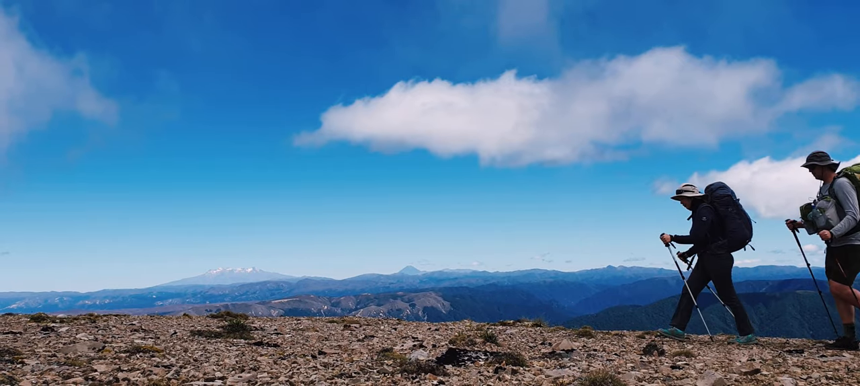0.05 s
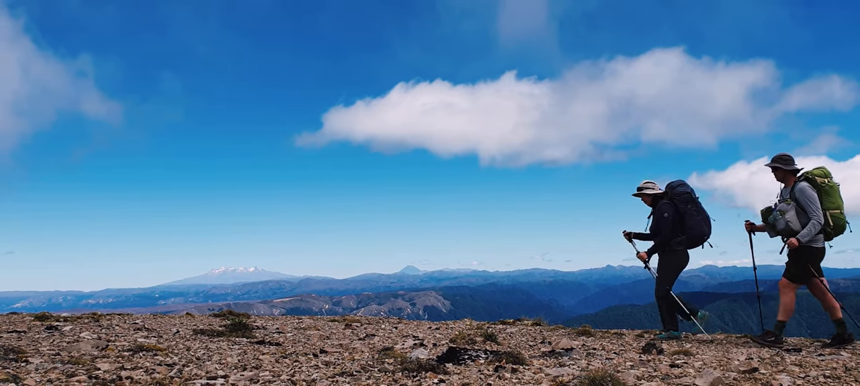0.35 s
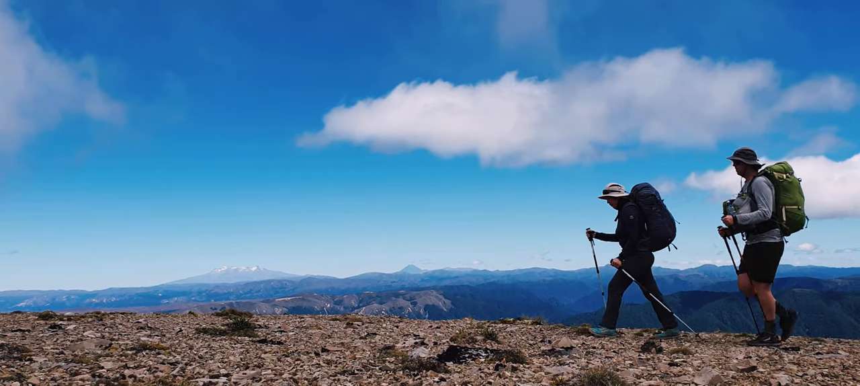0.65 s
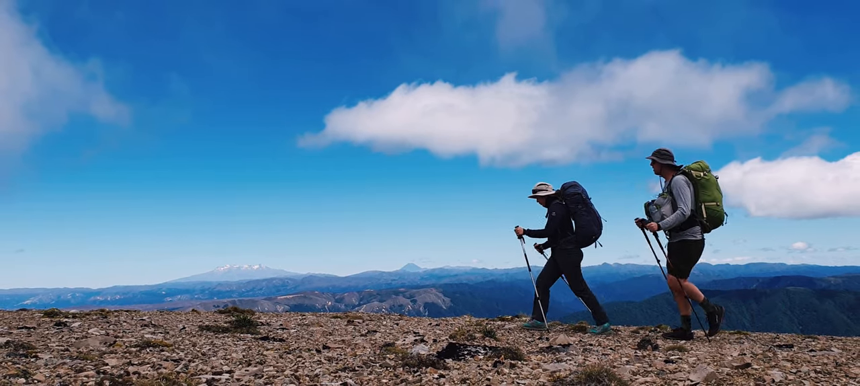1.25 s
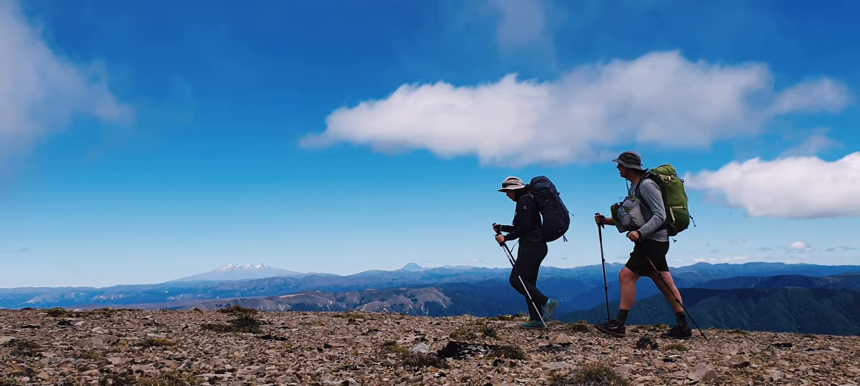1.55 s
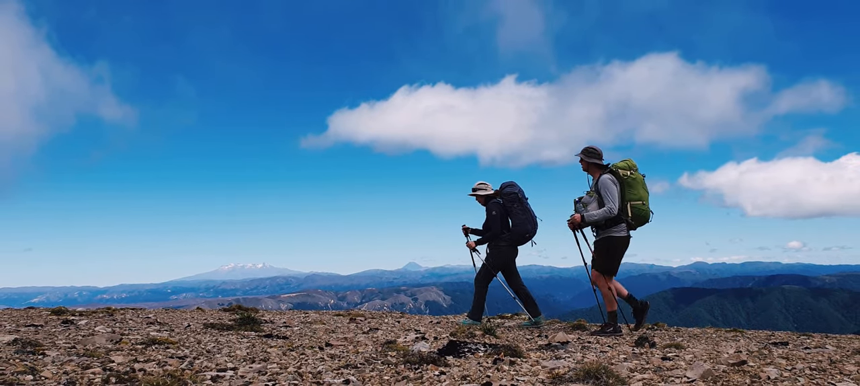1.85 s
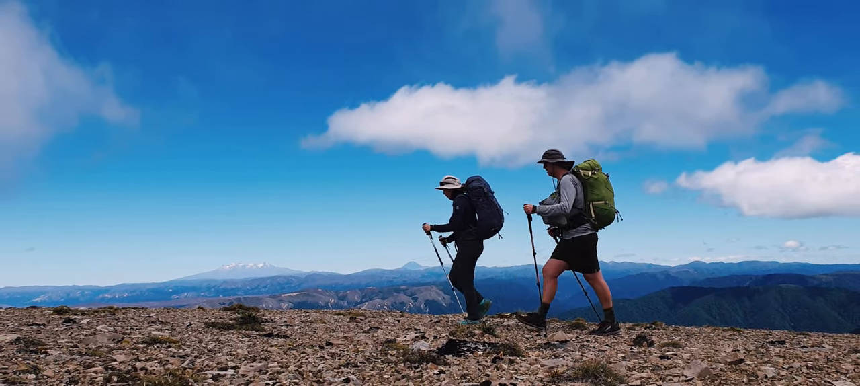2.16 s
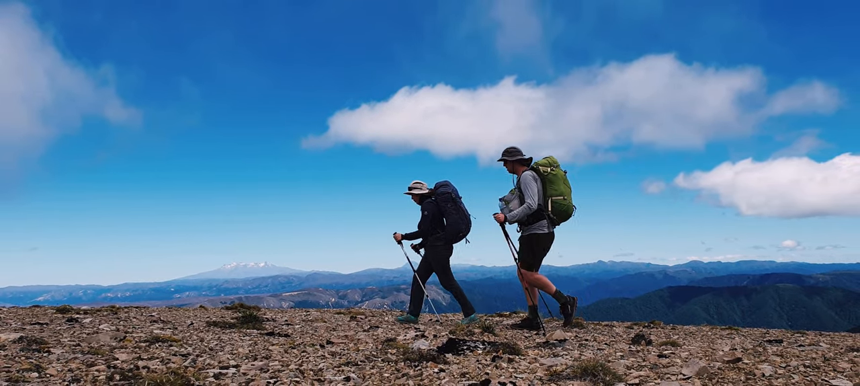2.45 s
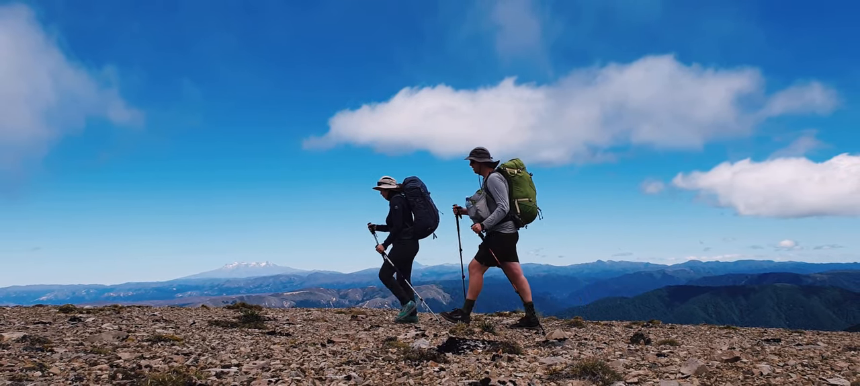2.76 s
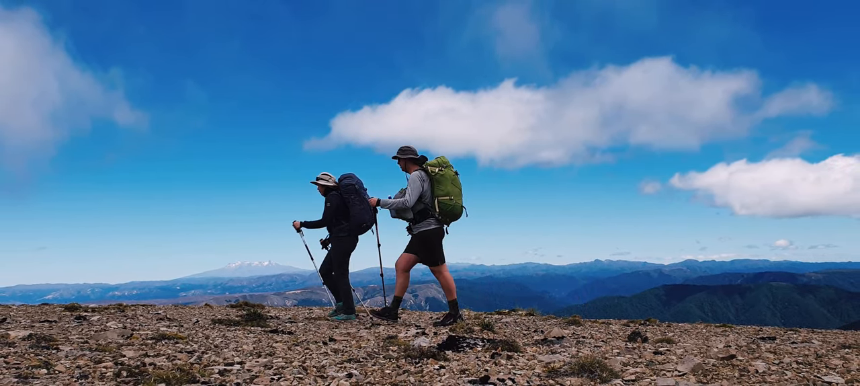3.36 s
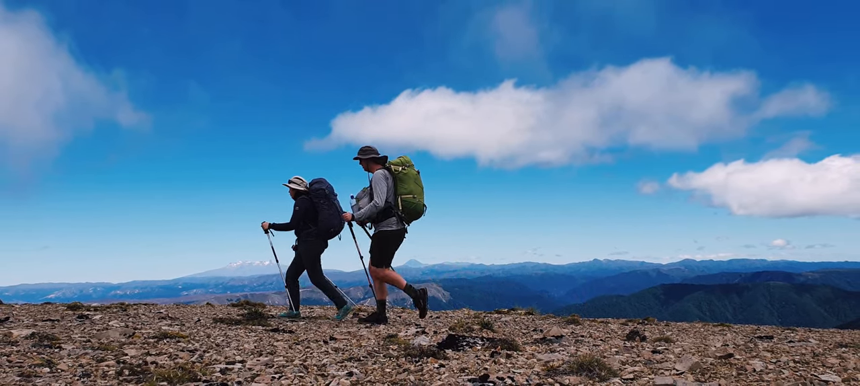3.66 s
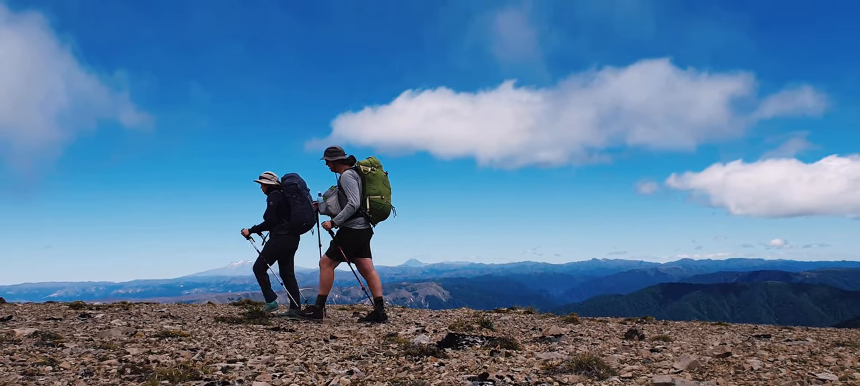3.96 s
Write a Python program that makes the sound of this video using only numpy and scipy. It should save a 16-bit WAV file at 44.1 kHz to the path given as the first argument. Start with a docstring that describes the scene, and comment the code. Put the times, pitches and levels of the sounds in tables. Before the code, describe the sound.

Footsteps with trekking poles cross stony open ground: sharp metal taps, small stone clacks and short gritty crunches come in scattered clusters. Gusts thump and rumble on the microphone the whole time, over a faint hiss.

```python
"""Two hikers with trekking poles cross a stony, open ridge from right to left.
Metal tips strike and skid on rock, ringing stone and shaft; loose stones knock, boots crunch grit.
The rough ground scatters each sound, and grit trickles between the steps.
Gusts rumble and buffet on the two microphone ports over a faint, steady hiss."""
import sys
import numpy as np
from scipy import signal
from scipy.fft import rfft, irfft
from scipy.io import wavfile

SR = 44100
rng = np.random.default_rng(int(sys.argv[2]) if len(sys.argv) > 2 else 0)


def wav_record(signal):
    """Record a signal, one row per channel, as 16-bit PCM in the file named by sys.argv[1]."""
    frames = np.transpose(np.atleast_2d(signal))
    bounded = np.clip(frames, -1, 1)
    # unit amplitude maps onto the largest positive 16-bit level
    quanta = np.round(bounded * 32767).astype(np.int16)
    wavfile.write(sys.argv[1], SR, quanta)


N = 176400
TIME_S, FREQS_HZ = np.arange(N) / SR, np.fft.rfftfreq(N, 1 / SR)
HIT_N = 8192
HIT_S, HIT_HZ = np.arange(HIT_N) / SR, np.fft.rfftfreq(HIT_N, 1 / SR)
SIDES = np.array([[1], [-1]])  # left, right
BLOW_S, NEAR_T60_S, GRIT_SPREAD_DB = 0.003, 0.02, 2


def amp(db):
    """Decibels to gain."""
    return 10 ** (np.asarray(db) / 20)


def unit(x):
    """Scale to rms 1."""
    return x / np.sqrt(np.mean(x ** 2) + 1e-30)


def lasting(x, length_s):
    """Scale to the energy of rms 1 held for length_s."""
    return x * np.sqrt(length_s * SR / (np.sum(x ** 2) + 1e-30))


def colour(spectrum, hz):
    """Gain of a spectrum table at hz."""
    freq_hz, level_db = np.transpose(spectrum)
    return amp(np.interp(np.log(hz + 1), np.log(freq_hz), level_db))


def add(mix, start_s, sound):
    """Mix in a stereo sound."""
    part = mix[:, round(start_s * SR):][:, :sound.shape[1]]
    part += sound[:, :part.shape[1]]


def noise(gain):
    """Coloured noise, independent per port."""
    return unit(irfft(rfft(rng.standard_normal((2, N))) * gain, N))


def ring(x, gain):
    """Minimum-phase filter with the given gains."""
    log_gain = np.log(np.maximum(np.r_[gain, gain[-2:0:-1]], 1e-5))
    response = np.exp(np.conj(signal.hilbert(log_gain)))[:len(gain)]
    return irfft(rfft(x) * response)


def scatter(x, t60_s):
    """Reflections off stony ground, different at each port."""
    t = np.arange(SR // 2) / SR
    taps = rng.standard_normal((2, len(t))) * amp(-60 * t / t60_s)
    taps /= np.linalg.norm(taps, axis=1, keepdims=True)
    return signal.fftconvolve(x, taps, axes=1)[:, :N]


def hiss(level_db=-75.5):
    """Faint, steady noise floor."""
    # freq_hz, density_db
    spectrum = [(100, 9), (900, 2.5), (1500, 0.5), (4500, -1), (5700, -7), (6800, -23), (8400, -15.5),
                (10000, -9), (11700, -3), (15500, -2.5)]
    return amp(level_db) * noise(colour(spectrum, FREQS_HZ))


def turbulence(spectrum, surge_db, strength, steady_s):
    """Air noise in quick surges, levelled over steady_s, then scaled by strength."""
    gain = colour(spectrum, FREQS_HZ)
    push = rng.standard_normal((2, N)) * amp(surge_db)
    power = (irfft(rfft(push) * gain, N) ** 2).mean(0)
    window = np.hanning(int(steady_s * SR))
    rms = np.sqrt(abs(signal.fftconvolve(power, window / window.sum(), "same")) + 1e-9)
    return irfft(rfft(push * strength / rms) * gain, N)


def wind(eddy_hz=50):
    """The same eddies drive a deep rumble and a lighter flutter above it."""
    # time_s, rumble_db, flutter_db
    gusts = [(0, -41.5, -51), (0.281, -42, -54), (0.449, -38, -50), (.56, -42.5, -57.5), (.76, -38, -57),
             (.95, -43.5, -48.5), (1.12, -37.5, -47.5), (1.28, -44.5, -55), (1.56, -46, -63.5),
             (1.79, -51.5, -69), (1.882, -42, -55.5), (2.08, -40.5, -54), (2.2, -44.5, -55),
             (2.438, -41, -55), (2.801, -41.5, -58.5), (3.001, -43, -56), (3.22, -46, -62),
             (3.36, -52.5, -67), (3.551, -41.5, -58), (3.698, -41, -56), (3.798, -55.5, -69.5),
             (3.889, -36.5, -53), (4, -49, -51.5)]
    # freq_hz, density_db
    rumble_spectrum = [(15, -53.5), (28, -16.5), (45, 0.5), (70, 2.5), (110, 0.5), (170, -7.5),
                       (260, -17.5), (450, -43.5), (900, -86)]
    # freq_hz, density_db
    flutter_spectrum = [(60, -13.5), (150, -3), (240, 0), (380, -8), (500, -17), (650, -30.5), (850, -39),
                        (1500, -68)]
    eddies = noise(1 / (1 + (FREQS_HZ / eddy_hz) ** 4))
    eddies = unit(eddies + eddies.mean(0))  # partly shared by the ports
    time_s, rumble_db, flutter_db = np.transpose(gusts)
    rumble_gain = amp(np.interp(TIME_S, time_s, rumble_db))
    flutter_gain = amp(np.interp(TIME_S, time_s, flutter_db))
    rumble = turbulence(rumble_spectrum, surge_db=4.5 * eddies, strength=rumble_gain, steady_s=0.085)
    flutter = turbulence(flutter_spectrum, surge_db=6 * eddies, strength=flutter_gain, steady_s=0.041)
    return amp(0.3 - 2.05 * SIDES) * rumble + amp(3 + 0.5 * SIDES) * flutter


def buffets(low_hz=66.4, top_hz=464.5, wake_db=5.5, wake_s=0.005974, left_db=-1.5):
    """An eddy slaps both ports with one pulse and leaves a ragged wake; small eddies sound higher."""
    # time_s, level_db, upper_edge_hz
    slaps = [(.037, -38.5, 188), (0.161, -34, 141), (0.224, -32.5, 107), (0.327, -44, 230),
             (.402, -40.5, 258), (0.437, -37.5, 146), (.566, -36.5, 138), (0.647, -41, 182),
             (0.69, -37.5, 126), (.889, -39.5, 267), (.935, -50.5, 250), (1.036, -40, 242),
             (1.055, -39, 186), (1.122, -38, 323), (1.175, -39.5, 340), (1.234, -44.5, 248),
             (1.309, -38, 162), (1.471, -41, 233), (1.654, -37.5, 176), (2.091, -40.5, 199),
             (2.283, -39, 144), (2.355, -41, 202), (2.375, -31.5, 117), (2.404, -44.5, 290),
             (2.525, -36.5, 193), (2.652, -39.5, 202), (2.755, -36.5, 170), (2.88, -40, 184),
             (2.928, -42.5, 167), (3.052, -40.5, 188), (3.584, -37.5, 111), (3.681, -45.5, 211),
             (3.761, -43.5, 177)]
    out = np.zeros((2, N))
    swell = HIT_S / wake_s * np.exp(-HIT_S / wake_s)
    for time_s, level_db, edge_hz in slaps:
        push = amp(wake_db) * lasting(rng.standard_normal((2, HIT_N)) * swell, 1 / SR)
        push[:, round(wake_s * SR)] += 1  # pressure pulse
        band = signal.butter(2, [min(low_hz, edge_hz / 2), edge_hz], "band", fs=SR, output="sos")
        thump = lasting(signal.sosfilt(band, push), length_s=0.05)
        add(out, time_s - wake_s, amp(level_db + SIDES * left_db) * thump)
    return signal.sosfilt(signal.butter(6, top_hz, fs=SR, output="sos"), out)


def trickle(level_db=-86.5, rate_per_s=430, pitch_hz=5450, width_hz=900):
    """Tiny bits of grit keep shifting."""
    size = amp(GRIT_SPREAD_DB * np.minimum(rng.exponential(1, (2, N)), 2))
    ticks = size * (rng.random((2, N)) < rate_per_s / SR)
    b, a = signal.iirpeak(pitch_hz, pitch_hz / width_hz, fs=SR)
    return amp(level_db) * unit(scatter(signal.lfilter(b, a, ticks), NEAR_T60_S))


def grains(rate_per_s):
    """Random tiny contacts of uneven size."""
    size = amp(GRIT_SPREAD_DB * np.minimum(rng.exponential(1, HIT_N), 3))
    sign = rng.choice([-1, 1], HIT_N)
    return unit(size * sign * (rng.random(HIT_N) < rate_per_s / SR))


def blow(decay_s):
    """One hard contact, then a quickly dying skid."""
    push = lasting(grains(rate_per_s=3000) * np.exp(-HIT_S / decay_s), 1 / SR)
    push[0] += 0.15  # first contact
    return push


def stone(push, pitch_hz, ring_db, modes_db, ring_octaves=0.3, half_width_hz=150):
    """Contacts excite a stone: a broad resonance at pitch_hz plus a few short modes."""
    # freq_hz, gain_db
    spectrum = [(200, -19), (1150, -0.5), (1800, 5.5), (6500, 3), (7700, -8), (11000, -10), (16000, -2)]
    # pitch_ratio, level_db
    modes = [(.76, -8.5), (1, 1.5), (1.361, -5), (2.09, -0.5)]
    bump = np.exp(-0.5 * (np.log2((HIT_HZ + 1) / pitch_hz) / ring_octaves) ** 2)
    peaks = 0
    for ratio, level_db in modes:
        mode_hz = ratio * pitch_hz * rng.normal(1, 0.03)
        peaks += amp(level_db) / (1 + ((HIT_HZ - mode_hz) / half_width_hz) ** 2)
    return ring(push, colour(spectrum, HIT_HZ) * amp(ring_db * bump) * (1 + amp(modes_db) * peaks))


def crunch(length_s, level_db, pitch_hz, rise_fraction=0.048):
    """Grit slips as weight comes onto a boot, then settles."""
    progress = HIT_S / length_s
    weight = np.minimum(progress / rise_fraction, 1) * np.exp(-2 * progress ** 2)
    grit = stone(grains(rate_per_s=280) * weight, pitch_hz, ring_db=10.5, modes_db=-23)
    return amp(level_db) * lasting(grit, length_s)


def knock(level_db, pitch_hz):
    """A loose stone tips against another under a boot."""
    clack = stone(blow(decay_s=0.004), pitch_hz, ring_db=8, modes_db=0)
    return amp(level_db) * lasting(clack, BLOW_S)


def pole(level_db, stone_hz, tick_db, shaft_db=-8.5):
    """A metal tip strikes and skids on rock with a bright tick; stone and shaft ring."""
    # freq_hz, gain_db
    tick_spectrum = [(900, -11), (2000, -6.5), (6000, 10), (8700, 4), (11500, 6), (16000, -14)]
    # freq_hz, level_db, t60_s
    shaft_modes = [(2800, -2.5, 0.067), (3840, 4, .05), (6280, 1.5, 0.031), (8180, -19, 0.09),
                   (10120, -10.5, 0.0078), (10800, -6.5, 0.026)]
    push = blow(decay_s=0.0022)
    tick = lasting(ring(push, colour(tick_spectrum, HIT_HZ)), BLOW_S)
    ringing = sum(amp(db - 60 * HIT_S / t60_s) * np.sin(2 * np.pi * hz * HIT_S)
                  for hz, db, t60_s in shaft_modes)
    shaft = lasting(signal.fftconvolve(push, ringing)[:HIT_N], BLOW_S)
    rock = lasting(stone(blow(decay_s=0.0041), stone_hz, ring_db=11, modes_db=-10), BLOW_S)
    return amp(level_db) * (rock + amp(tick_db) * tick + amp(shaft_db) * shaft)


def placed(start_s, sound):
    """The delay between ports follows the hikers; the camera body shades each port a little."""
    # time_s, left_delay_ms
    bearing = [(.2, 0.15), (2.3, 0.065), (3.5, -0.028)]
    # freq_hz, left_gain_db (negated on the right)
    port_shade = [(2400, -.6), (4400, 2.45), (7000, -0.2)]
    delay_ms = np.interp(start_s, *np.transpose(bearing))
    delayed = np.interp(HIT_S - delay_ms / 1000, HIT_S, sound)
    left = unit(delayed) * np.std(sound)
    shade = colour(port_shade, HIT_HZ)
    return np.array([ring(left, shade), ring(sound, 1 / shade)])


def hikers(near_db=-2.5, far_db=-5.5, far_t60_s=0.28):
    """Poles and boots; nearby ground scatters each sound, distant rocks add a faint tail."""
    # start_s, level_db, stone_hz, tick_db
    pole_strikes = [(.178, -86, 6700, 4), (.1902, -54, 6300, -4), (.2115, -72, 6640, 6),
                    (.408, -56, 4040, -10.5), (1.0195, -70, 4200, -18), (1.3045, -51.5, 6100, -16.5),
                    (1.3135, -54.5, 5800, -9), (1.3215, -62.5, 3200, -8), (1.357, -69, 2980, -14),
                    (2.0068, -63.5, 5270, -19), (2.0115, -62, 2920, -11), (2.2708, -68, 5550, -3),
                    (2.386, -60.5, 5750, 6), (2.39, -62.5, 6200, 2.5), (2.884, -60, 3600, -16),
                    (3.068, -61.5, 4400, -5.5)]
    # start_s, level_db, pitch_hz
    stone_knocks = [(.2885, -60.5, 2630), (.2995, -60, 2520), (.3105, -52, 2630), (.3235, -57.5, 2770),
                    (.4135, -59.5, 3800), (.4325, -60.5, 3650), (1.0745, -70, 5400), (2.398, -58.5, 3060),
                    (2.4763, -71.5, 2920), (2.4865, -65, 2900), (2.4967, -64.5, 2780), (2.9235, -60, 5000),
                    (2.935, -61, 4580), (2.957, -60.5, 4970), (3.0735, -64.5, 2480), (3.103, -75, 4230),
                    (3.4875, -57.5, 3940), (3.500, -58, 4870), (3.8085, -73, 3020)]
    # start_s, length_s, level_db, pitch_hz
    boot_crunches = [(.297, 0.054, -70, 5230), (.42, 0.16, -82, 4900), (1.073, 0.046, -78.5, 5330),
                     (1.33, 0.055, -82, 3200), (1.635, 0.059, -76, 5440), (1.848, 0.032, -79, 4800),
                     (2.25, 0.036, -70, 5830), (2.477, 0.052, -75, 5200), (2.888, 0.085, -76.5, 4430),
                     (2.925, 0.12, -77.5, 5000), (3.075, 0.043, -74.5, 4250), (3.486, 0.046, -65.5, 4470),
                     (3.525, 0.073, -78, 4760)]
    out = np.zeros((2, N))
    for events, source in ((pole_strikes, pole), (stone_knocks, knock), (boot_crunches, crunch)):
        for start_s, *settings in events:
            direct = placed(start_s, source(*settings))
            near = amp(near_db) * scatter(direct, NEAR_T60_S)
            far = amp(far_db) * scatter(direct, far_t60_s)
            add(out, start_s, direct)
            add(out, start_s, near + far)
    return out


def scene():
    """Hikers, grit, wind and hiss in stereo."""
    return hikers() + trickle() + wind() + buffets() + hiss()


def record(dry):
    """Microphone bass roll-off and treble band limit."""
    low_hz, top_hz = 37.6, 15850
    thinned = signal.sosfilt(signal.butter(2, low_hz, "high", fs=SR, output="sos"), dry)
    lowpass = signal.firwin(511, top_hz, window=("kaiser", 9), fs=SR)
    return signal.oaconvolve(thinned, lowpass[None], "same")


dry = scene()
out = record(dry)
wav_record(out)
```